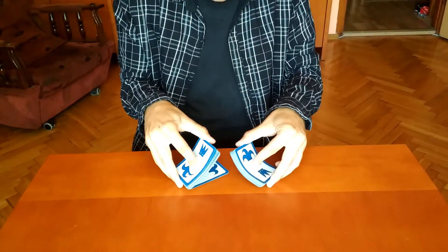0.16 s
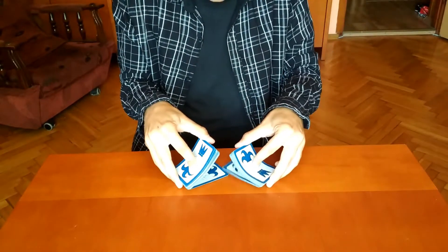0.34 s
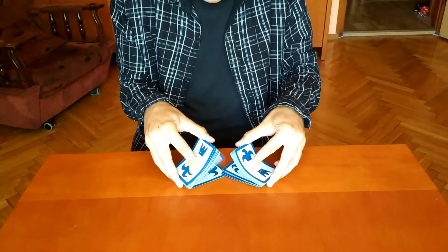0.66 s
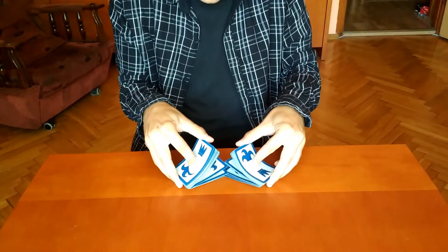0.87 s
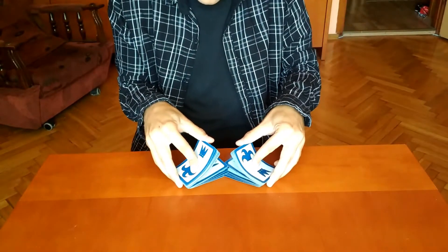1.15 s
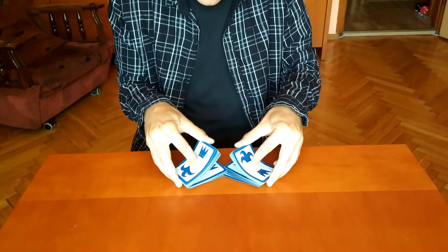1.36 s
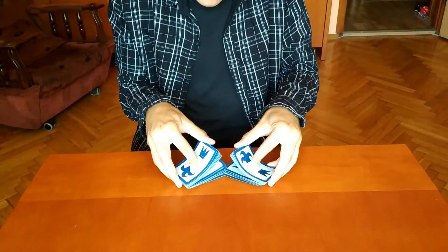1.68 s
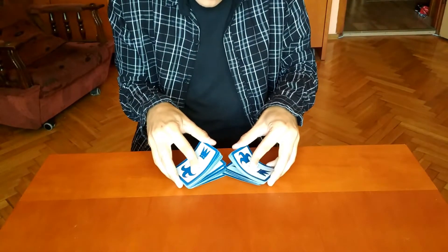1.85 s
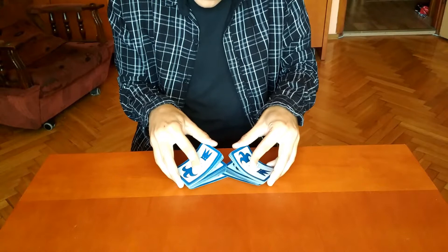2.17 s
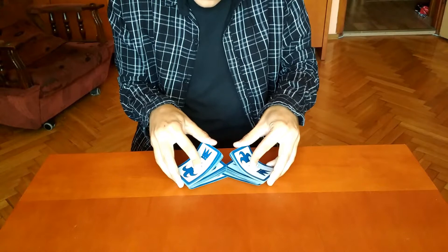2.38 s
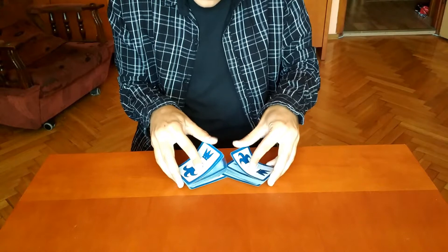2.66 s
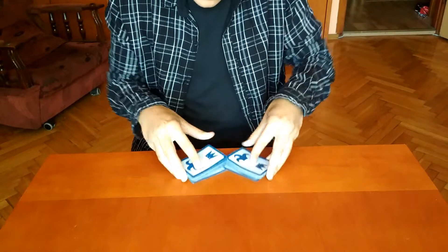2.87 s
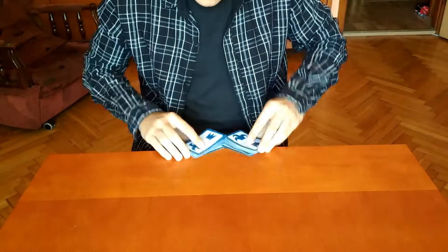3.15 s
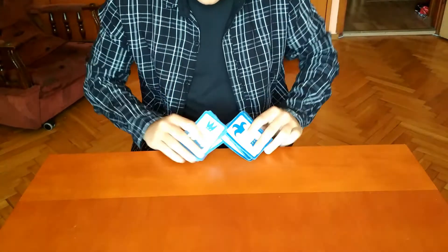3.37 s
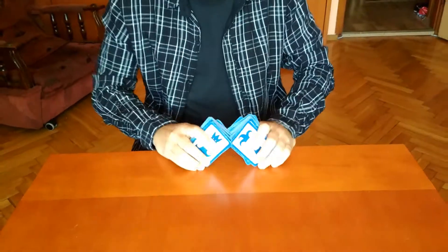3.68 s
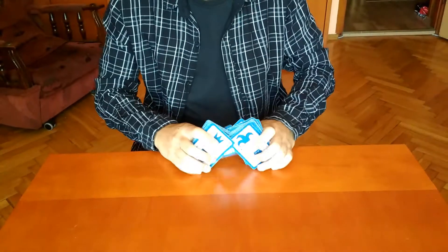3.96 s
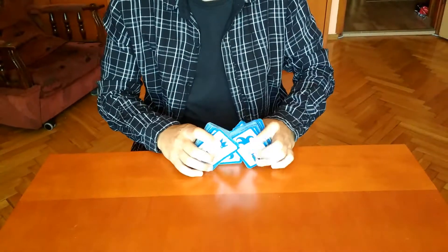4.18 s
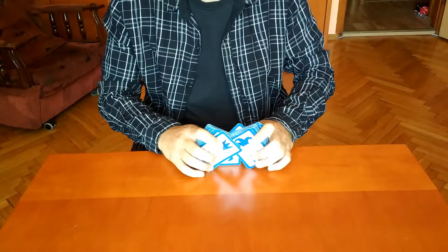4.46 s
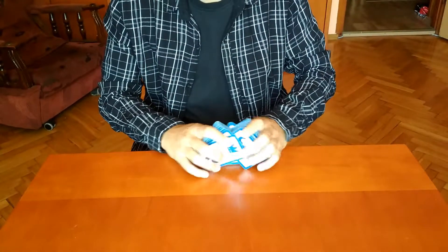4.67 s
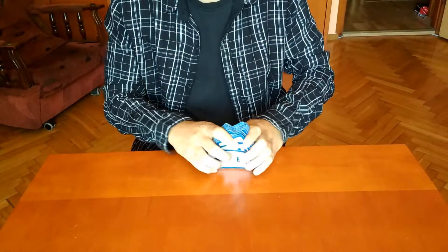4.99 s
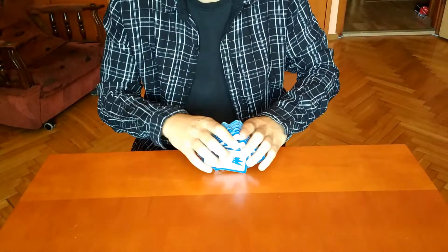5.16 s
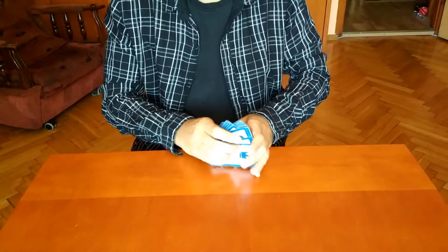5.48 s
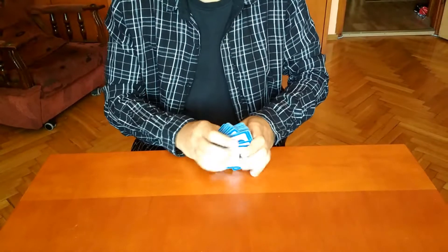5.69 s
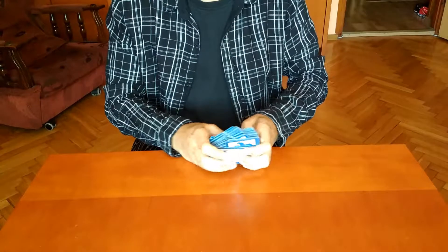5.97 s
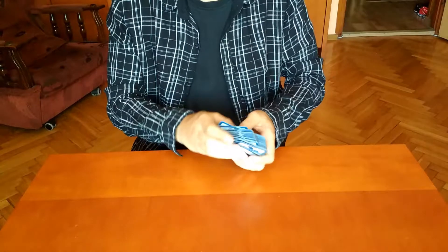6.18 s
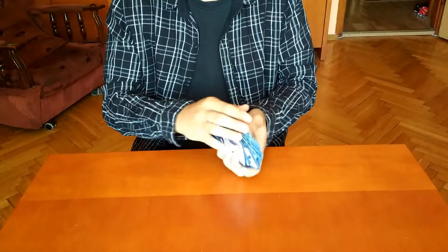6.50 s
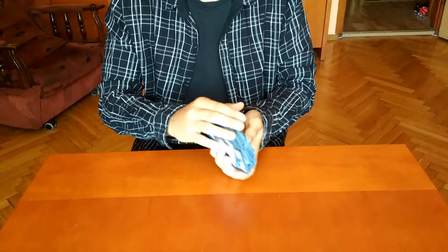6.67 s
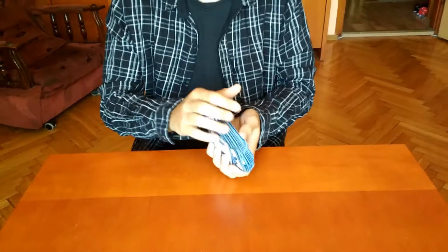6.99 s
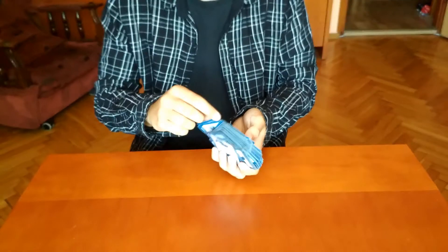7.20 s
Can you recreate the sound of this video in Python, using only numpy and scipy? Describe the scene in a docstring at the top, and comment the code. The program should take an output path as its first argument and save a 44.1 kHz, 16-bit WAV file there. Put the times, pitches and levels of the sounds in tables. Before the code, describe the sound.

A slow riffle shuffle of stiff cards: scattered snaps, a sliding hiss, hollow clacks and low knocks on a wooden table.

```python
"""Riffle shuffle on a wooden table

Stiff playing cards are riffled slowly in a live room with a parquet floor. Bent packets snap off the
thumbs, the halves slide together with friction noise, and the bridge lets go in dull clacks. The hands
square the deck and bump it on the table, whose top rings in its low modes. Each card sound is an
impact or a friction force, with the room's reverberation, filtered by the cards and the cupped hands."""
import sys
import numpy as np
from scipy import signal
from scipy.fft import rfft, irfft, next_fast_len
from scipy.io import wavfile
from scipy.ndimage import map_coordinates

SR = 44100
rng = np.random.default_rng(int(sys.argv[2]) if len(sys.argv) > 2 else 0)


def wav_out(sig):
    """Save sig, one row per channel (or a flat mono array), as 16-bit PCM at SR to the path in sys.argv[1]."""
    wavfile.write(sys.argv[1], SR, np.round(np.clip(np.atleast_2d(sig).T, -1, 1) * 32767).astype(np.int16))


N = 323694
BLOW, TAIL, LEAD = 1764, 19200, 882  # samples: span of a blow's level, room's tail, scrape before a click


def amp(db):
    """Amplitude ratio of a level in decibels."""
    return 10 ** (np.asarray(db) / 20)

def unit(x):
    """Normalisation to rms 1."""
    return x / np.sqrt(np.mean(x ** 2) + 1e-20)

def along(points, hz):
    """Interpolation of (f/Hz, value) points on a logarithmic frequency axis."""
    f, values = np.transpose(points)
    return np.interp(np.log(hz + 1), np.log(f + 1), values)

def add(track, s, x):
    """Superposition of x on the track from time s on."""
    i = max(round(s * SR), 0)
    track[:, i:i + x.shape[-1]] += x[..., :N - i]

def wobble(rate, n):
    """Smooth random modulation: a spline through 'rate' knots a second."""
    return map_coordinates(rng.standard_normal(int(n * rate / SR) + 4), [np.arange(n) * rate / SR])

def filtered(x, response):
    """Linear filtering: the spectrum of x times a frequency response."""
    n = x.shape[-1]
    m = next_fast_len(n + 4096)
    return irfft(rfft(x, m) * response(np.fft.rfftfreq(m, 1 / SR)), m)[..., :n]

def ports(x):
    """Path difference: sound from the front reaches the left microphone port one sample later."""
    return np.array([np.roll(x, 1), x])

# Depth of random fine peaks and dips in the spectrum: f/Hz, standard deviation/dB
RIPPLE_DEPTH = [(300, 1.5), (900, 3), (3000, 3.8), (6000, 3.6), (9000, 2.6)]
def coloured(x, *parts):
    """Minimum-phase filter of (spectrum, level/dB) parts; fresh random ripple adds a papery ring."""
    n = x.shape[-1]
    m = 2 * next_fast_len(n // 2 + LEAD)
    hz = np.fft.rfftfreq(m, 1 / SR)
    knots_hz = np.linspace(np.sqrt(300), np.sqrt(17000), 110) ** 2
    peaks = np.interp(hz, knots_hz, rng.standard_normal(len(knots_hz)))
    ripple = unit(amp(along(RIPPLE_DEPTH, hz) * peaks))
    power = sum((amp(db) * unit(ripple * amp(along(spectrum, hz)))) ** 2 for spectrum, db in parts)
    cepstrum = irfft(np.log(power) / 2)
    cepstrum[1:m // 2] *= 2  # folding the cepstrum makes the filter causal
    cepstrum[m // 2 + 1:] = 0
    return irfft(rfft(x, m) * np.exp(rfft(cepstrum)))[..., :n]

# Likeness of the diffuse field at the two ports: f/Hz, correlation
COHERENCE = [(100, 0.44), (180, 0.58), (380, 0.8), (800, 0.071), (1500, 0.09), (3000, 0.27), (8000, 0.011)]
def mid_side_gains(hz):
    """Spatial coherence: the balance of mid and side sets the left-right correlation."""
    angle = np.arccos(np.clip(along(COHERENCE, hz), -1, 1)) / 2
    return np.array([np.cos(angle), np.sin(angle)])

def diffuse_noise(n):
    """A diffuse field is alike at both ports in the bass and unrelated in the treble."""
    mid, side = filtered(rng.standard_normal((2, n)), mid_side_gains)
    return np.array([mid + side, mid - side])

# Reverberation time of the room: f/Hz, T60/s
ROOM_T60 = [(100, 0.47), (400, 0.27), (1000, 0.34), (3000, 0.34), (7000, 0.36), (12000, 0.275),
            (16000, 0.26)]
def room_tail(build_s=0.0017):
    """Reverberation of energy 1, decaying exponentially by band; new each time, as the hands move."""
    hz = np.fft.rfftfreq(256, 1 / SR)[:, None]
    t = np.arange(0, TAIL + 1, 128) / SR
    real, imag = rng.standard_normal((2, 2, len(hz), len(t)))
    spectra = (real + 1j * imag) * mid_side_gains(hz) * amp(-60 * t / along(ROOM_T60, hz))
    frames = irfft(spectra, axis=1) * signal.windows.cosine(256)[:, None]
    overlapped = frames[:, 128:, :-1] + frames[:, :128, 1:]
    mid, side = overlapped.transpose(0, 2, 1).reshape(2, TAIL)
    rise = 1 - np.exp(-(np.arange(TAIL) / SR / build_s) ** 2)
    return unit(np.array([mid + side, mid - side]) * rise) / np.sqrt(TAIL)

def reverberation(x):
    """Convolution with the room's impulse response."""
    return signal.fftconvolve(x, room_tail(), axes=1)[:, :TAIL]

TABLE_ECHO, WALL_ECHO = (0.0022, -6.5), (0.0079, -9.5)  # delay/s, level/dB
def with_echo(x, delay_s, db, corner_hz=1600):
    """Specular reflection adds the treble that the cards beam at a surface, with a lag for each port."""
    lags = np.round(delay_s * SR * rng.uniform(.93, 1.07, 2)).astype(int)
    treble = filtered(x, lambda hz: (1j * hz / (corner_hz + 1j * hz)) ** 2)
    echo = np.array([np.pad(port, (lag, 0))[:len(port)] for port, lag in zip(treble, lags)])
    return x + amp(db) * echo

def contact(t60, width, scrape_db, scrape_s, spike):
    """Impact excitation of energy 1: a rising scrape, then decaying noise with one hard spike."""
    t = (np.arange(BLOW) - LEAD) / SR
    envelope = np.where(t < 0, amp(scrape_db) * np.exp(-abs(t) / scrape_s), amp(-60 * abs(t) / t60))
    noise = ports(rng.standard_normal(BLOW)) + width * diffuse_noise(BLOW)
    click = unit(envelope * noise) / np.sqrt(BLOW)
    click[:, LEAD + 12] -= spike
    return np.pad(unit(click) / np.sqrt(BLOW), ((0, 0), (0, TAIL - BLOW)))

def blow(direct, parts, wet_db, build_s):
    """Source and filter: an impact and its reverberation share one spectral colour."""
    tail = np.pad(room_tail(build_s), ((0, 0), (LEAD, 0)))[:, :TAIL]
    return np.sqrt(BLOW) * coloured(direct + amp(wet_db) * tail, *parts)

def stroke(peak_s, swell_s, fade_s, parts, grain_db, rate):
    """Friction noise follows sliding speed as the faces catch and slip; returns (start/s, sound)."""
    t = np.arange(TAIL) / SR - 3 * swell_s
    speed = np.exp(-(t / np.where(t < 0, swell_s, fade_s)) ** 2 / 2)
    catches = amp(grain_db * wobble(rate, TAIL))
    noise = ports(rng.standard_normal(TAIL)) + .5 * rng.standard_normal((2, TAIL))
    rub = speed * unit(catches * noise)
    return peak_s + t[0], coloured(amp(-3) * rub + amp(-4) * reverberation(rub), *parts)

def flutter(rate, scatter_db):
    """A random impulse train: single cards slip about 'rate' times a second with uneven force."""
    times = np.cumsum(rng.uniform(.3, 1.7, 40)) / rate
    sizes = amp(scatter_db * rng.standard_normal(40))
    return np.bincount((times * SR).astype(int), sizes, TAIL)[:TAIL]


# Spectra of the room tone and the low rumble: f/Hz, relative level/dB
TONE_SPECTRUM = [(15, -30), (25, 4.5), (44, -1), (130, -22.5), (200, -13.5), (354, -23), (394, -19),
                 (911, -23), (1020, -24), (2840, -28), (5730, -30.5), (11600, -25.5), (16000, -29.5)]
RUMBLE_SPECTRUM = [(15, 2), (35, 2), (70, -7.5), (115, -8.5), (170, -21), (300, -35), (800, -69.5)]
# Course of the rumble as the arms move: t/s, relative level/dB
ARM_SWAY = [(0.701, -71.5), (1.399, -53.5), (1.48, -75.5), (1.96, -58), (2.82, -56.5), (2.92, -68),
            (3.4, -46.5), (3.599, -61), (3.66, -44.5), (3.9, -54.5), (3.99, -42), (4.43, -64),
            (4.969, -56.5), (5.01, -66.5), (5.99, -59.5), (6.64, -74), (6.73, -57), (7.34, -65)]
def background():
    """Ambient noise: a faint steady diffuse field and an amplitude-modulated rumble."""
    tone = unit(filtered(diffuse_noise(N), lambda hz: amp(along(TONE_SPECTRUM, hz))))
    sway_db = np.interp(np.arange(N) / SR, *np.transpose(ARM_SWAY))
    noise = rng.standard_normal(N) + .5 * rng.standard_normal((2, N))
    rumble = unit(filtered(noise, lambda hz: amp(along(RUMBLE_SPECTRUM, hz))))
    return amp(-68) * tone + amp(sway_db - 2) * rumble

# Spectra of a packet's slap, a card's flexure and its edge tick: f/Hz, relative level/dB
SLAP_SPECTRUM = [(30, -14), (75, -8), (130, -7.5), (220, -5.5), (380, -1.5), (650, -8), (1150, -7),
                 (1800, -12), (5000, -44.5)]
FLEX_SPECTRUM = [(500, -39), (1200, -20), (1700, -5), (2800, 2.5), (4500, -0.5), (6500, -2), (10000, -19.5)]
EDGE_SPECTRUM = [(2500, -41.5), (5000, -9.5), (7500, -7), (11000, 0), (13500, 3.5), (16000, -9),
                 (18000, -29.5)]
# Edges snapping off the thumbs or past each other:
# t/s, slap level/dB, flex level/dB, edge level/dB, contact T60/s, direct sound gain/dB
THUMB_SNAPS = [(0.2644, -56.5, -56.5, -42.5, 0.024, -2), (.284, -64.5, -59.5, -55.5, 0.0065, 1),
               (0.4565, -31.5, -32.5, -25, 0.007, 1), (0.9608, -79, -71, -58, 0.018, 3),
               (0.967, -48, -50.5, -42.5, 0.0057, -1), (1.0784, -80, -72, -53.5, 0.0045, 3.5),
               (1.1336, -61.5, -48, -42, 0.012, 2.5), (1.262, -64, -57, -48.5, 0.0049, 3),
               (1.316, -70.5, -70, -61, 0.0087, 12), (2.077, -61.5, -49, -37.5, 0.012, -2.5),
               (2.1292, -62.5, -58.5, -40, 0.0076, 4), (2.4129, -63.5, -54, -39.5, 0.0066, 0),
               (2.575, -76, -55.5, -49, 0.0093, 1.5), (2.642, -84.5, -61.5, -49.5, 0.011, 3),
               (2.652, -56.5, -49, -46.5, 0.031, 0), (2.751, -66, -55.5, -36.5, 0.016, -4),
               (2.7613, -51, -59, -32.5, 0.008, -0.5), (2.811, -65.5, -58, -55, .004, 8.5),
               (2.8189, -55.5, -74, -51, 0.0079, 8.5), (3.748, -47, -62, -55.5, 0.022, -2),
               (4.11, -79, -67.5, -74, 0.0077, 10.5), (4.828, -81, -57, -72, 0.016, 2.5),
               (5.2724, -63, -49.5, -73, 0.015, 8.5), (5.5, -60, -60.5, -56, 0.0045, 4),
               (5.5212, -76, -62, -54.5, 0.019, 2.5), (5.9682, -73.5, -69, -77, 0.0045, 5.5)]
def snaps():
    """Release of elastic energy: a bent packet leaves the thumb, ticks, flexes and slaps the pile."""
    out = np.zeros((2, N))
    for s, slap_db, flex_db, edge_db, t60, direct_db in THUMB_SNAPS:
        click = contact(t60, width=1.0, scrape_db=-18, scrape_s=0.003, spike=0.09)
        click = with_echo(click, *TABLE_ECHO)
        click = with_echo(click, *WALL_ECHO)
        parts = [(SLAP_SPECTRUM, slap_db), (FLEX_SPECTRUM, flex_db), (EDGE_SPECTRUM, edge_db)]
        add(out, s - LEAD / SR, blow(amp(direct_db) * click, parts, wet_db=0, build_s=0.013))
    return out

# Fingertips dragging on a card: t/s, f/Hz, half length/s, level/dB
FINGER_SQUEAKS = [(0.441, 2830, 0.00098, -44), (0.976, 2830, 0.0037, -32.5), (.99, 2720, .004, -50),
                  (3.148, 1100, 0.022, -53), (3.25, 700, 0.023, -50), (3.388, 364, 0.0099, -52.5),
                  (5.24, 430, 0.0093, -45.5), (5.459, 807, 0.01, -39.5), (5.597, 765, .007, -50),
                  (6.246, 3045, 0.0064, -68), (6.448, 2690, 0.0099, -66)]
def squeaks():
    """Stick-slip friction of skin on a card excites one narrow resonance."""
    out = np.zeros((2, N))
    peak_shape = [(-2, -50), (-.25, -11), (0, 0), (.25, -11), (2, -50)]  # offset/octaves, level/dB
    for s, hz, half_s, db in FINGER_SQUEAKS:
        resonance = [(hz * 2 ** octaves, drop) for octaves, drop in peak_shape]
        add(out, *stroke(s, half_s, half_s, [(resonance, db)], grain_db=-3, rate=240))
    return out

def landing(parts, t60, direct_db):
    """Multiple impact: a packet lands flat and its cards follow one by one in a fading patter."""
    t = np.arange(TAIL) / SR
    click = contact(t60, width=0.36, scrape_db=-14, scrape_s=0.002, spike=0.3)
    patter = flutter(rate=310, scatter_db=4) * np.exp(-t / 0.043)
    patter = np.pad(patter, (LEAD, 0))[:TAIL]
    direct = amp(direct_db) * click + amp(-8.5) * ports(unit(patter)) / np.sqrt(TAIL)
    return blow(direct, parts, wet_db=-3, build_s=0.0055)

# Spectra of the cupped hands, a flat clack and its edge tick: f/Hz, relative level/dB
HOLLOW_SPECTRUM = [(60, -19.5), (190, -13), (320, 0), (520, 8), (850, 0), (1300, -9), (4000, -73.5)]
CLACK_SPECTRUM = [(350, -35.5), (750, 0), (1100, 1), (1600, 2.5), (2400, -2.5), (3200, -15.5), (5000, -32),
                  (12000, -47)]
TICK_SPECTRUM = [(1500, -17.5), (3300, 6), (4300, -1.5), (6500, -8.5), (11000, -12.5), (16000, -17),
                 (18000, -58.5)]
# Packets falling on the pile or inside the hands: t/s, hollow level/dB, clack level/dB,
# tick level/dB, contact T60/s, direct sound gain/dB, relative level of loose cards/dB
PACKET_FALLS = [(0.457, -47.5, -37, -47, .005, 7, -31), (2.763, -49.5, -57, -70, .004, 2, -25),
                (2.8196, -54, -56.5, -74, 0.008, 2.5, -24), (3.2263, -45.5, -49, -63, 0.0096, -5, -3),
                (3.7830, -42.5, -45.5, -84, 0.014, -3.5, -27), (4.017, -63, -54, -73, 0.032, -4.5, -30),
                (4.031, -43.5, -38.5, -54, 0.021, -3, -1), (4.082, -52.5, -45.5, -59.5, 0.0054, -0.5, -9),
                (4.112, -57, -58, -75, .006, 4, -20), (4.2971, -56, -50, -45.5, 0.0039, 1, -22.5),
                (4.2994, -44.5, -34.5, -43, 0.018, -4, -9), (4.3045, -49.5, -38, -47.5, 0.008, -5.5, -27),
                (4.337, -52, -39.5, -61, 0.0036, -2, -20), (4.3577, -44, -36.5, -54, 0.0064, -8.5, -16.5),
                (4.6283, -55, -45.5, -55.5, 0.011, -1.5, -4), (4.637, -59, -46.5, -83, .008, -4.5, -23.5),
                (4.69, -61.5, -47, -65, 0.0097, -0.5, -26), (4.7547, -85, -65, -51.5, 0.0044, -2, -6),
                (4.8879, -43.5, -35, -39, 0.02, -9, -16), (4.8911, -45.5, -32, -41, .005, 0.5, -3.5),
                (5.2591, -55.5, -40, -43.5, 0.0083, -6, -1.5), (5.4996, -60, -52.5, -77, 0.006, 7.5, -23),
                (5.595, -53.5, -67.5, -67, 0.046, 3, -23), (5.7637, -47, -88, -99, 0.01, -3.5, -25),
                (5.7766, -52, -86, -96, 0.0032, -9, -7), (5.8814, -51, -58, -60, 0.05, 2.5, -23)]
def clacks(settle_s=0.057, spread_s=0.012):
    """Cavity resonance of the hands makes each landing hollow; loose cards settle in the same colour."""
    out = np.zeros((2, N))
    for s, hollow_db, clack_db, tick_db, t60, direct_db, loose_db in PACKET_FALLS:
        parts = [(HOLLOW_SPECTRUM, hollow_db), (CLACK_SPECTRUM, clack_db), (TICK_SPECTRUM, tick_db)]
        add(out, s - LEAD / SR, landing(parts, t60, direct_db))
        start, rustle = stroke(s + settle_s, spread_s, spread_s, parts, grain_db=6.5, rate=320)
        add(out, start, amp(loose_db - 2.5) * rustle)
    return out

# Modes of the table top: f/Hz, relative level/dB
TABLE_MODES = [(81, -7.5), (138, -7.5), (172, -2), (255, -7), (311, 1.5), (389, 1.5), (548, -12),
               (705, 1.5), (750, -11.5), (874, -15.5), (1103, -9), (1299, -9.5)]
# Deck and knuckles on the table: t/s, level/dB, favoured f/Hz, contact time/s,
# T60/s (which the resting hands shorten)
TABLE_KNOCKS = [(0.46, -34.5, 373, 0.016, 0.3), (.457, -39.5, 1180, 0.005, .2),
                (0.458, -36, 145.1, 0.012, .2), (.462, -42, 80.9, .012, .35),
                (0.966, -43.5, 352, 0.0081, 0.35), (2.078, -57.5, 410, 0.0018, 0.11),
                (2.128, -57.5, 290, 0.0018, 0.14), (2.411, -58.5, 336, 0.0014, 0.18),
                (2.652, -57, 352, 0.002, 0.13), (2.762, -49, 396, 0.0015, 0.096),
                (2.82, -46.5, 392, 0.0014, 0.18), (3.226, -36, 402, 0.019, 0.26),
                (3.465, -58.5, 390, 0.034, 0.3), (3.737, -46, 350, 0.0053, .2),
                (5.748, -52, 409, 0.007, .24), (5.772, -53.5, 720, 0.0052, 0.14),
                (5.866, -31, 320, 0.016, 0.29)]
def table_knocks(thud_db=28, thud_t60=0.012):
    """Modal vibration: a knock dents the top with a thud; where it lands decides which modes ring most."""
    out, t = np.zeros((2, N)), np.arange(TAIL) / SR
    for s, db, favoured_hz, contact_s, t60 in TABLE_KNOCKS:
        ring = np.zeros(TAIL)
        for hz, mode_db in TABLE_MODES:
            share = 0.16 + np.exp(-(np.log2(hz / favoured_hz) / 0.23) ** 2)
            ring += share * amp(mode_db) * np.sin(2 * np.pi * (hz * t + rng.random()))
        rise = 1 - np.exp(-(t / contact_s) ** 2)  # a soft contact smothers the thud
        ring *= amp(-60 * t / t60) * rise
        thud = amp(thud_db - 60 * t / thud_t60) * rise * np.sin(2 * np.pi * favoured_hz * t)
        add(out, s, amp(db - 2) * (ring / np.std(ring[:BLOW]) + thud))
    return out

# Bent cards creeping past the thumb: t/s, duration/s, level/dB
EDGE_CREEPS = [(2.074, 0.035, -60), (2.496, 0.27, -66), (2.67, .08, -60), (2.762, 0.062, -45)]
def creeps():
    """Intermittent slip: single edges escape the thumb in an uneven run of tiny ticks."""
    out, t = np.zeros((2, N)), np.arange(TAIL) / SR
    for s, length_s, db in EDGE_CREEPS:
        slips = flutter(rate=130, scatter_db=6.5) * (t < length_s)
        slips = unit(slips) * np.sqrt(length_s * SR / TAIL)  # rms 1 within the run
        ticks = with_echo(ports(slips), *TABLE_ECHO)
        parts = [(EDGE_SPECTRUM, db), (FLEX_SPECTRUM, db - 17.5)]
        add(out, s, coloured(ticks + amp(-10) * reverberation(ticks), *parts))
    return out

# Spectrum of sliding edges: f/Hz, relative level/dB
HISS_SPECTRUM = [(1000, -20), (3000, -20.5), (5000, 0.5), (8000, 2.5), (11500, 12.5), (13500, 12.5),
                 (16000, 3.5), (18000, -45)]
# Cards pushed over each other:
# peak t/s, swell time/s, hollow level/dB, rasp level/dB, flex level/dB, hiss level/dB
PUSHES = [(2.567, 0.012, -60, -79, -58, -57), (2.674, 0.019, -75, -53, -49.5, -60),
          (2.808, 0.025, -46, -61, -45.5, -43), (3.0, 0.038, -80, -87, -74, -76),
          (3.096, 0.041, -87, -91.5, -74, -41.5), (3.156, 0.04, -88, -66, -50, -37),
          (3.2, 0.031, -82, -63, -53, -41), (3.231, .013, -45, -48.5, -46.5, -31),
          (3.38, 0.0073, -58, -56, -60.5, -56), (3.48, 0.041, -67, -78.5, -71, -67),
          (3.569, 0.019, -64, -72, -56.5, -64), (4.122, 0.021, -54, -40, -61, -59.5),
          (4.786, 0.014, -82.5, -51, -61, -38), (4.855, 0.017, -52, -47, -67, -57),
          (4.94, .024, -43.5, -39.5, -67, -39), (5.144, 0.017, -74.5, -79, -62.5, -62),
          (5.219, 0.0086, -52, -66.5, -84, -87.5), (5.28, 0.025, -47, -60, -77, -77),
          (5.361, .007, -43.5, -36, -58, -72), (5.406, 0.014, -48, -37, -53.5, -73),
          (5.448, 0.013, -38.5, -41, -49.5, -44), (5.548, 0.033, -53.5, -59, -61.5, -69),
          (5.606, 0.0065, -76, -54, -65, -41), (5.755, 0.0092, -57, -89, -93, -92),
          (5.837, 0.01, -42.5, -57.5, -87, -93), (5.892, 0.02, -34, -46, -55, -61.5),
          (6.805, 0.013, -93, -77, -74, -81.5), (7.288, 0.013, -95, -92.5, -69.5, -63)]
def slides():
    """Sliding friction: edges hiss evenly, faces catch and rasp, and the hollow of the hands resonates."""
    out = np.zeros((2, N))
    for peak_s, swell_s, hollow_db, rasp_db, flex_db, hiss_db in PUSHES:
        fade_s = 0.97 * swell_s
        faces = [(HOLLOW_SPECTRUM, hollow_db), (CLACK_SPECTRUM, rasp_db), (FLEX_SPECTRUM, flex_db)]
        add(out, *stroke(peak_s, swell_s, fade_s, faces, grain_db=4, rate=350))
        add(out, *stroke(peak_s, swell_s, fade_s, [(HISS_SPECTRUM, hiss_db)], grain_db=0.5, rate=250))
    return out


def scene():
    """Linear superposition of cards, fingers, table and ambient noise."""
    return snaps() + creeps() + clacks() + slides() + squeaks() + table_knocks() + background()

# Imbalance of the microphone ports: f/Hz, left minus right level/dB
PORT_BALANCE = [(300, 0.5), (1200, -1), (4000, 0.5), (6000, -2), (8000, 0), (10500, -6.5), (13000, -2),
                (16000, 1.5)]
def record(dry, ceiling=0.8, top_hz=16300):
    """Transduction: the ports colour the treble differently, peaks saturate softly, the band is limited."""
    balanced = filtered(dry, lambda hz: amp(np.outer([.5, -.5], along(PORT_BALANCE, hz))))
    rounded = balanced / (1 + (balanced / ceiling) ** 6) ** (1 / 6)
    return filtered(rounded, lambda hz: 1 / np.sqrt(1 + (hz / top_hz) ** 120))


dry = scene()
out = record(dry)
wav_out(out)
```